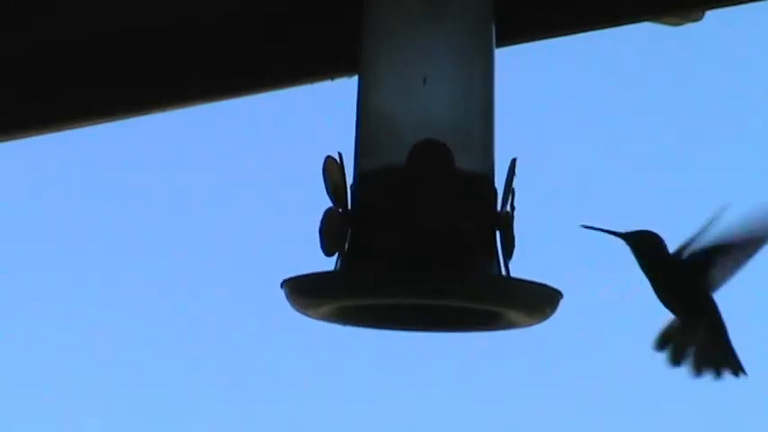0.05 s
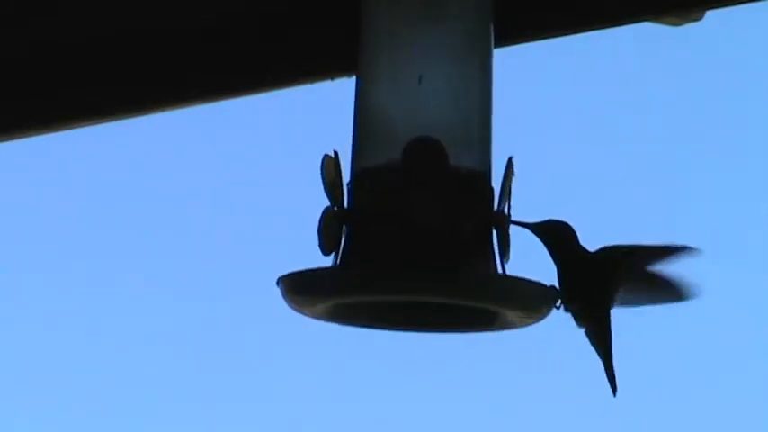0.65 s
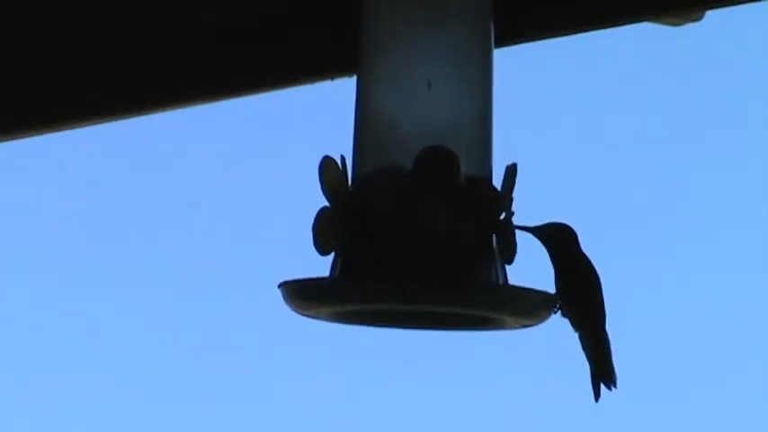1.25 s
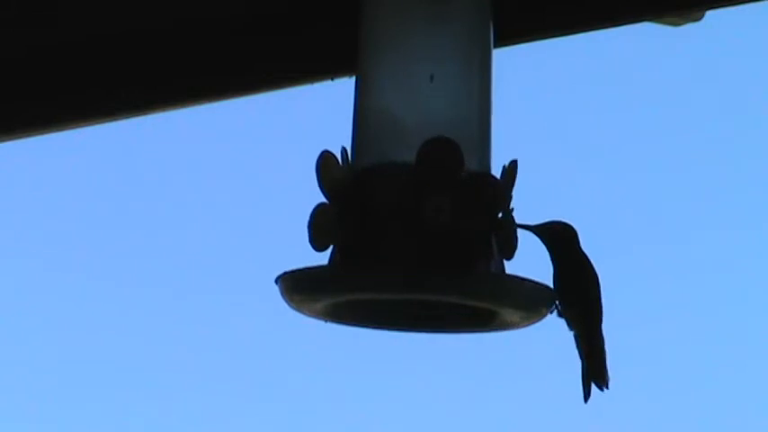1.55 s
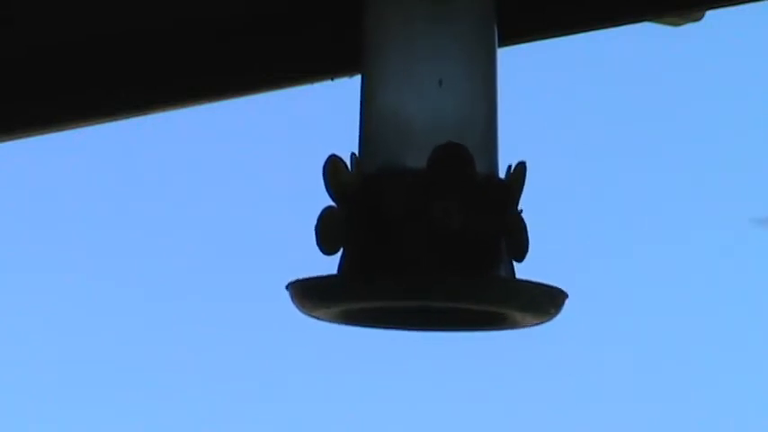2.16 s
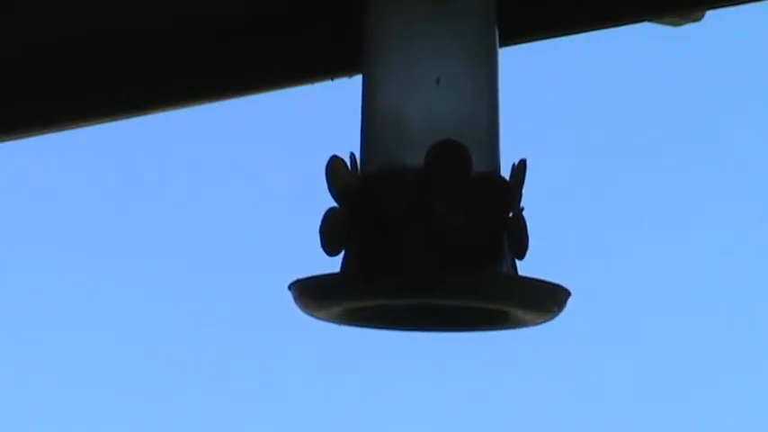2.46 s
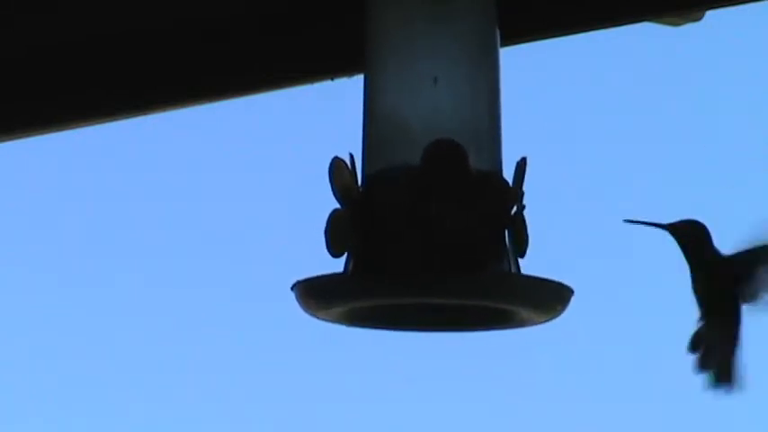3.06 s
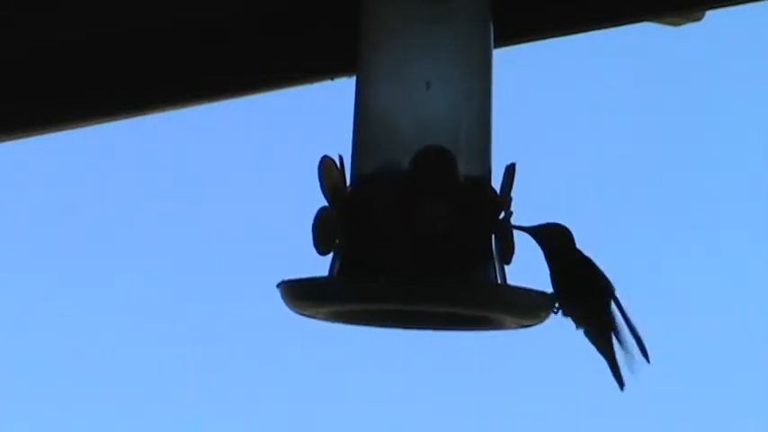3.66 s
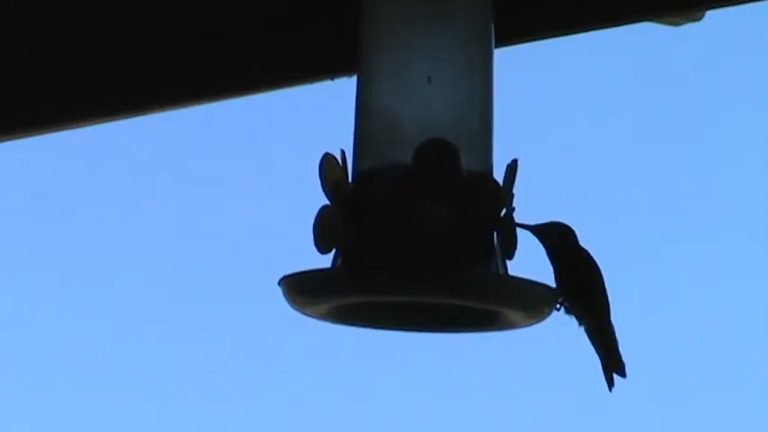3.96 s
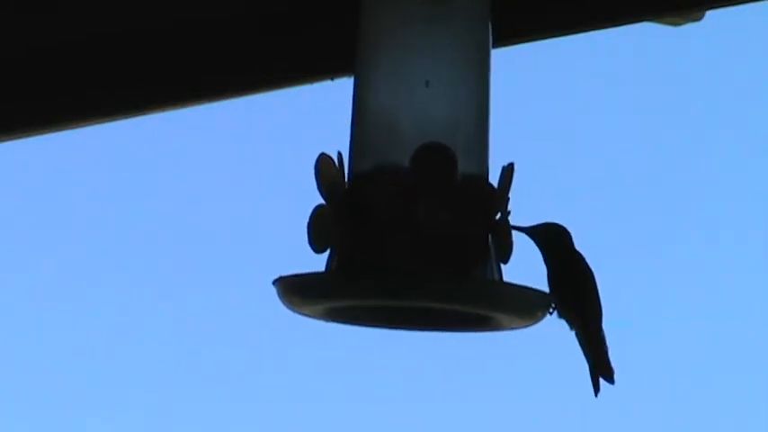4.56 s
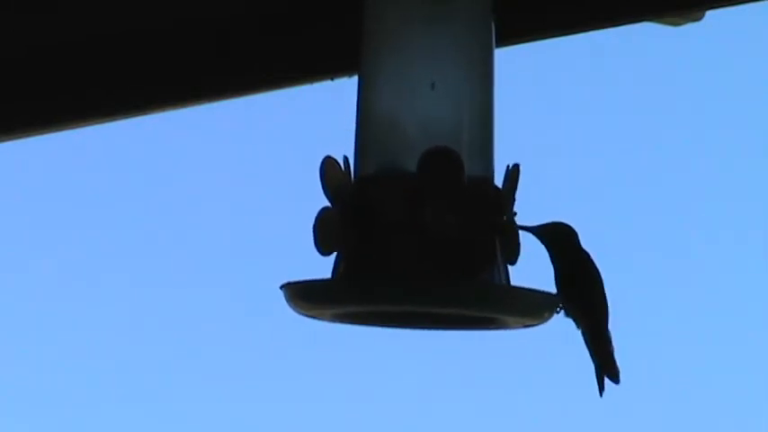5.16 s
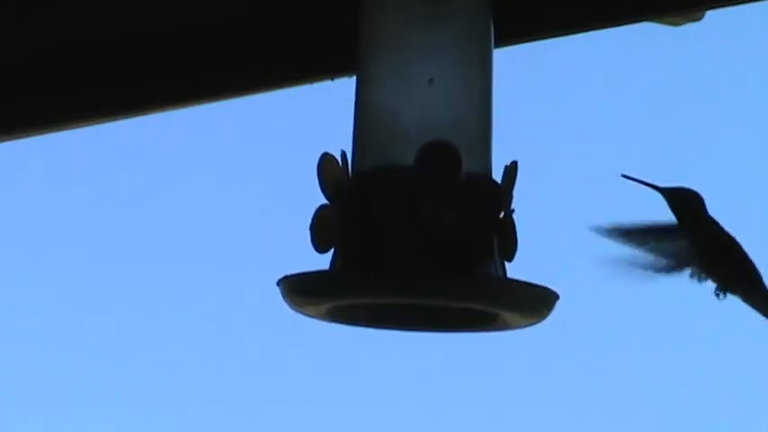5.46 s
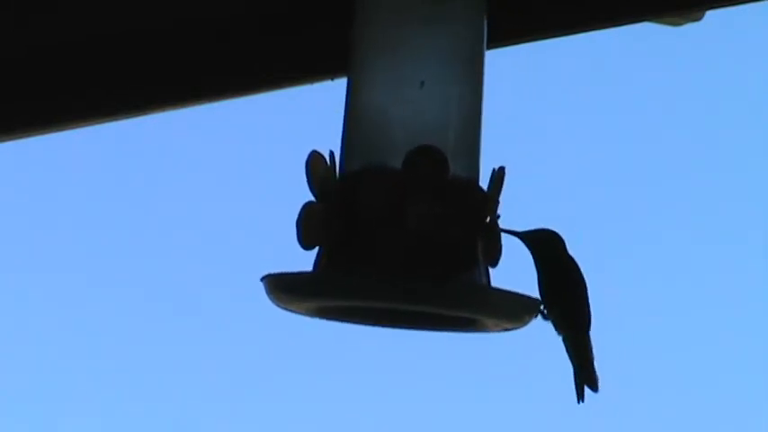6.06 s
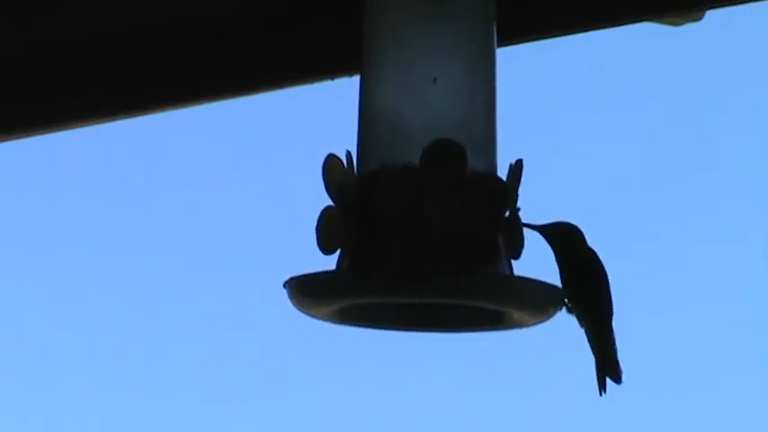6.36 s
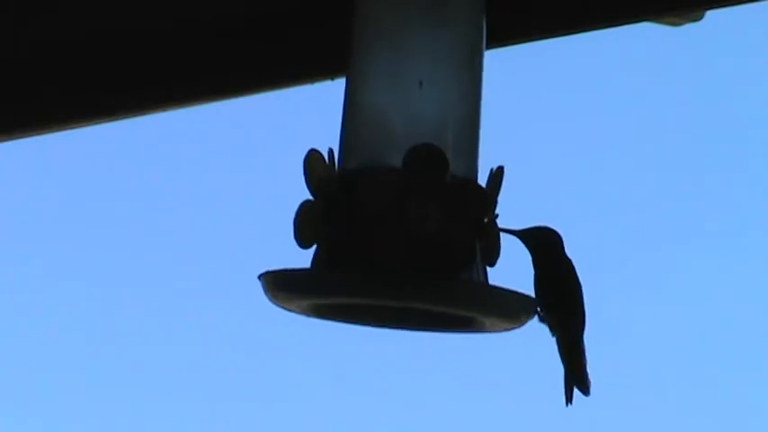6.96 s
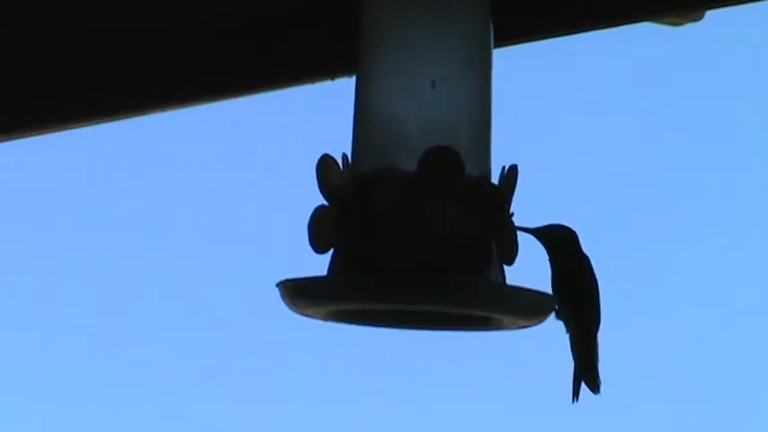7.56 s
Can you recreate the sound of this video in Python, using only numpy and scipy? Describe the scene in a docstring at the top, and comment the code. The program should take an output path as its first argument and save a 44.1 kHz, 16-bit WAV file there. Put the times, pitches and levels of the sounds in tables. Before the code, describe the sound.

Finches whistle and twitter outdoors while hummingbirds chip and scold at a feeder, with thin distant bird calls and soft background air.

```python
"""Finches whistle and twitter in a garden, each note a nearly pure, gliding tone of the syrinx.
Hummingbirds chip (two voices in a rasp) and scold (rough harmonics in a throat resonance).
Thin high slurs and low hoots come from farther off; eaves, walls and trees echo every call.
Beneath lie outdoor air, two soft puffs, a distant motor spinning up, hums, and camera hiss and whine."""
import sys
import numpy as np
from scipy import signal
from scipy.fft import rfft, irfft, next_fast_len
from scipy.io import wavfile
from scipy.ndimage import map_coordinates

SR = 44100
rng = np.random.default_rng(int(sys.argv[2]) if len(sys.argv) > 2 else 0)


def persist_wave(psi):
    """Save psi, clipped to +-1, as 16-bit WAV."""
    counts = np.round(np.clip(psi, -1, 1) * 32767).astype(np.int16)
    wavfile.write(sys.argv[1], SR, np.atleast_2d(counts).T)


N = 344862
PREROLL = SR // 4  # samples before time zero, whose echoes still ring
SOFT_EDGES = dict(attack_s=.011, release_s=.013)


def amp(db):
    """Decibels to gain."""
    return 10 ** (np.asarray(db) / 20)


def unit(x):
    """Scale to rms 1."""
    return x / np.sqrt(np.mean(x ** 2) + 1e-20)


def along(points, hz):
    """Read (frequency [Hz], value) points on a log axis."""
    knots_hz, values = np.transpose(points)
    return np.interp(np.log(hz + 1), np.log(knots_hz + 1), values)


def wobble(knots_per_s, size):
    """Smooth random curve, rms about 1."""
    knots = rng.standard_normal(int(size * knots_per_s / SR) + 4)
    return map_coordinates(knots, [np.arange(size) * knots_per_s / SR])


def filtered(x, response):
    """Apply a gain given as a function of frequency."""
    size = x.shape[-1]
    padded = next_fast_len(size + 8192)
    return irfft(rfft(x, padded) * response(np.fft.rfftfreq(padded, 1 / SR)), padded)[..., :size]


def bell(x, centre, width):
    """Gaussian, peak 1; width is two sigma."""
    return np.exp(-.5 * ((x - centre) / (width / 2)) ** 2)


def phase_of(hz):
    """Phase [rad] of a moving frequency."""
    return 2 * np.pi * np.cumsum(hz) / SR


def clock(length_s):
    """Sample times [s]."""
    return np.arange(int(length_s * SR)) / SR


def silence():
    """Empty track with preroll."""
    return np.zeros(PREROLL + N)


def add(track, at_s, sound):
    """Mix a sound into a track."""
    start = PREROLL + round(at_s * SR)
    part = sound[:len(track) - start]
    track[start:][:len(part)] += part


def stereo_noise(coherence, size):
    """White noise at two close microphones."""
    def mid_side_gains(hz):
        angle = np.arccos(np.clip(along(coherence, hz), -1, 1)) / 2
        return np.array([np.cos(angle), np.sin(angle)])
    mid, side = filtered(rng.standard_normal((2, size)), mid_side_gains)
    return np.array([mid + side, mid - side])


def air():
    """Outdoor air and microphone hiss."""
    # noise spectrum: (frequency [Hz], relative level [dB])
    spectrum = [(20, -15), (45, -6), (120, 0.5), (165, -3.5), (210, 3.5), (260, -2), (800, -4.5),
                (1200, -7), (3000, -9), (6000, -16), (9000, -19)]
    # left-right likeness: (frequency [Hz], coherence [0-1])
    coherence = [(60, 0.85), (130, 1), (300, 0.021), (1500, 0.046), (8000, 0.48), (13000, 0.98)]
    level_db = -51.5 + .3 * wobble(3.1, N)
    noise = filtered(stereo_noise(coherence, N), lambda hz: amp(along(spectrum, hz)))
    return amp(level_db) * unit(noise)


def hums():
    """Steady hums and the camera's whine, wavering slightly."""
    # tones: (frequency [Hz], level [dB])
    tones = [(37, -75), (72, -65), (543.5, -63.5), (15736, -67)]
    out = np.zeros(N)
    for hz, db in tones:
        gain = np.sqrt(2) * amp(db + 1.76 * wobble(3.97, N))
        out += gain * np.sin(phase_of(hz + 1.296 * wobble(9, N)))
    return out


def motor():
    """Distant throbbing motor: the shaft gathers speed, then holds it."""
    # loudness: (time [s], level [dB])
    loudness = [(2.2, -79), (2.26, -68), (3.23, -61), (3.47, -66.5), (4.78, -59), (4.96, -53.5),
                (5.57, -55.5), (5.63, -61.5), (6.09, -55), (6.33, -66), (6.62, -55.5), (7.8, -72)]
    start_s, start_hz, spin_up_hz_per_s, full_hz = 2.2, 29, 72.3, 58.5
    t = np.arange(N) / SR
    shaft_hz = np.minimum(start_hz + spin_up_hz_per_s * np.maximum(t - start_s, 0), full_hz)
    return np.sqrt(2) * amp(np.interp(t, *np.transpose(loudness))) * np.sin(phase_of(shaft_hz))


def puffs():
    """A soft rustle and a low puff: swells of band noise."""
    # swells: (time [s], length [s], centre [Hz], width [Hz], level [dB])
    swells = [(1.695, 0.046, 1500, 4500, -50), (3.04, 0.11, 257, 220, -55.5)]
    out = silence()
    for at_s, length_s, centre_hz, width_hz, db in swells:
        size = int(length_s * SR)
        noise = unit(filtered(rng.standard_normal(size), lambda hz: bell(hz, centre_hz, width_hz)))
        add(out, at_s, amp(db) * np.hanning(size) * noise)
    return out


def echoes(early_db, late_db):
    """Impulse response: quick echoes off eaves and walls, a longer wash from the trees."""
    # decay of the wash: (frequency [Hz], T60 [s])
    wash_t60 = [(2500, 0.61), (7000, 0.43), (14000, 0.18)]
    wash_rise_s, wall_t60_s, wall_delay_s = .01, .16, .002
    hz, t, spectra = signal.stft(stereo_noise([(2000, .55)], SR * 3 // 4), SR, nperseg=256)
    wash = signal.istft(spectra * amp(-60 * t / along(wash_t60, hz)[:, None]), SR, nperseg=256)[1]
    t = np.arange(wash.shape[1]) / SR
    wash *= 1 - np.exp(-t / wash_rise_s)
    walls = stereo_noise([(2000, .52)], len(t)) * amp(-60 * t / wall_t60_s) * (t > wall_delay_s)
    early = amp(early_db) * walls / np.linalg.norm(walls)
    late = amp(late_db) * wash / np.linalg.norm(wash)
    return np.sqrt(2) * (early + late)


def garden(call, early_db, late_db, pan_db):
    """Direct call plus echoes that shift as the bird turns, so held notes swell and waver."""
    facing_rad = 1.1 * wobble(10, len(call))
    wet = sum(signal.fftconvolve((call * share)[None], echoes(early_db, late_db), axes=1)[:, :len(call)]
              for share in (np.cos(facing_rad), np.sin(facing_rad)))
    direct = np.array([call * amp(pan_db / 2), np.roll(call, 1) * amp(-pan_db / 2)])  # left leads
    return (direct + wet)[:, PREROLL:]


def note(pitch_hz, db, waver, waver_per_s, overtones_db=(), attack_s=.0028, release_s=.0026):
    """Nearly pure syrinx tone; waver is a share of the pitch."""
    t = np.arange(len(pitch_hz)) / SR
    phase = phase_of(pitch_hz * (1 + waver * wobble(waver_per_s, len(t))))
    air_valve = np.clip(np.minimum(t / attack_s, (t[-1] - t) / release_s), 0, 1)
    beak_hz, beak_width_hz = 11700, 6900  # overtones escape only through this resonance
    overtones = sum(amp(level_db) * bell(k * pitch_hz, beak_hz, beak_width_hz) * np.sin(k * phase)
                    for k, level_db in enumerate(overtones_db, 2))
    return np.sqrt(2) * amp(db) * air_valve * (np.sin(phase) + overtones)


def slurs(singer):
    """Yield time, pitch and level of one voice's plain glides."""
    # glides: (voice, time [s], length [s], from [Hz], to [Hz], mid level [dB], swell [dB])
    glides = [("whistler", 1.83, .25, 2280, 1480, -39, -4), ("whistler", 2.275, .036, 2200, 2580, -39, 4),
              ("whistler", 2.305, .05, 3350, 2430, -43.5, 14),
              ("whistler", 2.572, .036, 2200, 2540, -36.5, 4),
              ("whistler", 2.6, .054, 3350, 2430, -42.5, 15), ("whistler", 2.265, .025, 2850, 3350, -56, 0),
              ("whistler", 2.56, .025, 2850, 3350, -50, 0), ("whistler", 3.18, .1, 1830, 1570, -44, -6),
              ("far", 2.0, .17, 5900, 4300, -65, 0), ("far", 2.31, .07, 4900, 6550, -56, 6.8),
              ("far", 2.38, .085, 6450, 5500, -57, -2), ("far", 2.51, .14, 4850, 3550, -62.5, -3),
              ("far", 3.445, .04, 7200, 5100, -62, 0), ("far", 2.9, .1, 5750, 5480, -62.5, 2),
              ("far", 2.98, .05, 5100, 4200, -63, 0), ("far", 4.98, .08, 7200, 8030, -63, 8),
              ("far", 5.06, .155, 8030, 5850, -54, 2), ("far", 5.38, 0.087, 6700, 7200, -60, -8),
              ("far", 5.53, .15, 7870, 5830, -56.5, 1), ("far", 5.76, 0.074, 6900, 3900, -56, 4.6),
              ("far", 5.85, .14, 3550, 3070, -61, -3), ("far", 6.39, .15, 7350, 5500, -62, 8),
              ("far", 6.82, .14, 8640, 6940, -58, 3), ("far", 7.215, .255, 8550, 4950, -54, 7.3),
              ("far", 7.65, .16, 3450, 3720, -56.5, 0), ("hoarse", 1.812, 0.0496, 2490, 2350, -46.5, -6),
              ("hoarse", 4.115, 0.0395, 2800, 3400, -53, 0), ("hoarse", 4.32, 0.0596, 3560, 3880, -45.5, 0),
              ("hoarse", 6.578, .025, 5600, 4200, -53, 0), ("hoarse", 6.655, .09, 3200, 4900, -45, -3),
              ("peep", 4.255, 0.0296, 3400, 2850, -36, 0), ("peep", 6.594, .03, 3350, 2800, -35, 0)]
    easing = .5  # 0 straight, 1 eased in and out
    for voice, at_s, length_s, from_hz, to_hz, db, swell_db in glides:
        if voice == singer:
            u = clock(length_s) / length_s
            eased = u + easing * (np.sin(np.pi * u / 2) ** 2 - u)
            yield at_s, from_hz * (to_hz / from_hz) ** eased, db + swell_db * (u - .5)


def hoots():
    """Low distant calls, some clear, some gruff."""
    # hoots: (time [s], length [s], pitch [Hz], level [dB], roughness [share of pitch])
    calls = [(.44, 0.066, 854, -66, .025), (.78, .08, 865, -67, .025), (1.03, 0.086, 862, -65, .04),
             (3.49, 0.088, 779, -57, .12), (3.814, 0.081, 805, -55.5, .09)]
    out = silence()
    for at_s, length_s, hz, db, roughness in calls:
        pitch_hz = np.full(int(length_s * SR), hz)
        add(out, at_s, note(pitch_hz, db, waver=roughness, waver_per_s=200, **SOFT_EDGES))
    return out


def far_birds():
    """Thin high slurs, and short pips that sag and fade."""
    # pips: (time [s], start level [dB], start pitch [Hz])
    pips = [(4.243, -44, 4450), (4.54, -47.5, 6180), (4.676, -43.5, 6430), (4.815, -46, 6480),
            (4.96, -46, 6430)]
    pip_s, sag_hz_per_s, fade_db_per_s = .035, 17300, 450
    out, t = silence(), clock(pip_s)
    for at_s, pitch_hz, db in slurs("far"):
        add(out, at_s, note(pitch_hz, db, waver=.014, waver_per_s=970, **SOFT_EDGES))
    for at_s, db, hz in pips:
        add(out, at_s, note(hz - sag_hz_per_s * t, db - fade_db_per_s * t,
                            waver=.03, waver_per_s=743, attack_s=.0069))
    return out


def rasp(length_s):
    """Short swell of gritty hiss from a small throat."""
    # hiss spectrum: (frequency [Hz], relative level [dB])
    spectrum = [(1500, -21), (2800, 2), (4500, -1.5), (7000, -4.5), (9000, -13), (14000, -29)]
    size = int(length_s * SR)
    hiss = filtered(rng.standard_normal(size), lambda hz: amp(along(spectrum, hz)))
    return unit(hiss * np.hanning(size) * amp(3 * wobble(602, size)))


def hummingbird_chips():
    """Both sides of the syrinx sing a small arch of pitch; a rasp marks the onset."""
    # chips: (time [s], crest [Hz], tone level [dB], rasp level [dB])
    chips = [(3.153, 3500, -56, -54.5), (3.18, 3240, -49.5, -56.5), (3.241, 4180, -54.5, -58),
             (3.318, 4180, -54, -57), (3.392, 4100, -55, -59), (3.605, 4400, -53, -60),
             (3.635, 4080, -49.5, -64), (3.695, 4200, -55, -60), (3.783, 4930, -50, -57),
             (3.958, 4890, -46, -54), (4.04, 4400, -55, -59), (5.058, 3000, -54, -53),
             (5.092, 3500, -51, -51), (5.174, 3050, -49.5, -60), (5.25, 3090, -53.5, -55),
             (5.32, 2990, -54, -55), (5.436, 3100, -52, -58), (5.5, 3140, -48, -61),
             (6.278, 2900, -44, -58), (6.411, 2850, -45, -60), (6.495, 2900, -51, -62)]
    length_s, crest_place, bend = .0301, .3, .55
    upper_ratio, upper_db = 1.64, -9
    out, u = silence(), clock(length_s) / length_s
    for at_s, crest_hz, tone_db, rasp_db in chips:
        pitch_hz = crest_hz * (1 - bend * (u - crest_place) ** 2)
        for hz, db in [(pitch_hz, tone_db), (upper_ratio * pitch_hz, tone_db + upper_db)]:
            add(out, at_s, note(hz, db, waver=.02, waver_per_s=900, attack_s=.006, release_s=.008))
        add(out, at_s, amp(rasp_db) * rasp(length_s=.018))
    return out


def hummingbird_scolds():
    """Harmonics sag and break up in a sinking throat resonance; hiss leads the voice."""
    # scolds: (time [s], level [dB], start pitch [Hz], start resonance [Hz])
    scolds = [(3.728, -52, 766, 6540), (3.908, -50, 730, 6100), (5.815, -46.5, 741, 6600),
              (5.998, -44, 747, 6350), (6.174, -45, 741, 6400)]
    length_s, rasp_lead_s, rasp_db = .08, .022, -7.5
    pitch_sag, throat_sag, roughness = .45, .27, .03  # shares reached by the end
    out, u = silence(), clock(length_s) / length_s
    harmonics = np.arange(2, 14)[:, None]
    for at_s, db, start_hz, throat_hz in scolds:
        jitter = roughness * np.sqrt(u) * wobble(1200, len(u))
        pitch_hz = start_hz * (1 - pitch_sag * u ** 2) * (1 + jitter)
        throat = bell(harmonics * pitch_hz, throat_hz * (1 - throat_sag * u), throat_hz / 4.2)
        phases = harmonics * phase_of(pitch_hz) + rng.uniform(0, 2 * np.pi, harmonics.shape)
        voice = (throat * np.sin(phases)).sum(0)
        add(out, at_s, amp(db) * unit(voice * u * (1 - u) ** 2))
        add(out, at_s - rasp_lead_s, amp(db + rasp_db) * rasp(length_s + rasp_lead_s))
    return out


def hoarse_calls_and_peeps():
    """Slurs turned hoarse by fast pitch shake, and clearer falling peeps."""
    out = silence()
    for at_s, pitch_hz, db in slurs("hoarse"):
        add(out, at_s, note(pitch_hz, db, waver=.121, waver_per_s=1100, attack_s=.0095))
    for at_s, pitch_hz, db in slurs("peep"):
        add(out, at_s, note(pitch_hz, db, waver=.025, waver_per_s=900, **SOFT_EDGES))
    return out


def finch_twitter():
    """One learnt "tsee-oo", a chain of pitch arches, repeated and closed by a flourish."""
    # one syllable: (delay [s], length [s], crest place [0-1], crest [Hz], drop [Hz], level [dB])
    arches = [(.002, 0.015, 0.53, 5100, 1100, -36.5), (.016, 0.019, .55, 6610, 1900, -27.5),
              (0.042, 0.013, .6, 4154, 200, -29.5), (.057, .034, 0.06, 4000, 830, -31)]
    # syllables sung: (time [s], gain [dB], pitch [ratio])
    syllables = [(-.079, 0.5, .97), (.037, -1.5, .96), (.153, -1.5, .97), (.268, -1.5, .97),
                 (6.77, 0, 0.98), (6.886, .5, 0.97), (7, 0, 0.96)]
    # one flourish: (delay [s], pitch [Hz], level [dB])
    contour = [(.002, 2628, -31), (.02, 2320, -43), (.046, 2094, -52), (.062, 2427, -35),
               (.075, 3072, -24.5), (.088, 2350, -34), (.105, 1956, -40), (.148, 1610, -58)]
    # flourishes sung: (time [s], gain [dB], pitch [ratio])
    flourishes = [(.388, -4.5, 1), (7.12, -3.5, 1)]
    out = silence()
    for at_s, gain_db, ratio in syllables:
        for delay_s, length_s, crest, crest_hz, drop_hz, db in arches:
            from_crest = np.abs(clock(length_s) / length_s - crest) / max(crest, 1 - crest)
            pitch_hz = ratio * (crest_hz - drop_hz * from_crest ** 1.69)  # more pointed than a parabola
            add(out, at_s + delay_s, note(pitch_hz, db + gain_db, waver=.0098, waver_per_s=734,
                                          overtones_db=[-22, -30], attack_s=.0056, release_s=.0033))
    knots_s, knots_hz, knots_db = np.transpose(contour)
    t = np.arange(knots_s[0], knots_s[-1], 1 / SR)
    pitch_hz, db = np.interp(t, knots_s, knots_hz), np.interp(t, knots_s, knots_db)
    for at_s, gain_db, ratio in flourishes:
        add(out, at_s + knots_s[0], note(ratio * pitch_hz, db + gain_db, waver=.015, waver_per_s=726))
    return out


def dives():
    """Yield time, pitch and level of whistles that drop fast, then slide on as they swell."""
    # whistles: (time [s], length [s], start [Hz], trough [Hz], end [Hz], dive time constant [s],
    # final level [dB], swell [dB])
    whistles = [(.935, 0.3, 2950, 1975, 1880, .018, -40, 6),
                (1.365, 0.265, 3250, 2400, 2435, .012, -33, 6.5),
                (3.75, .238, 3080, 1890, 2730, .023, -27, 15),
                (4.508, .22, 3200, 1926, 2698, 0.024, -27.5, 13.5),
                (5.041, .2, 2074, 1827, 1875, 0.0076, -35.5, 0),
                (5.993, 0.34, 2840, 1947, 1828, .018, -37.5, 1)]
    for at_s, length_s, start_hz, trough_hz, end_hz, dive_s, db, swell_db in whistles:
        t = clock(length_s)
        slide_hz = trough_hz + (end_hz - trough_hz) * t / length_s
        dive_hz = (start_hz - trough_hz) * np.exp(-t / dive_s)
        yield at_s, slide_hz + dive_hz, db - swell_db * (1 - t / length_s) ** 2


def yodels():
    """Yield time, pitch and level of whistles that fall, then flip up to a held note."""
    # yodels: (time [s], fall [s], hold [s], start [Hz], low [Hz], held [Hz], end [Hz],
    # fall level [dB], held level [dB], hold swell [dB])
    calls = [(0, 0.055, 0.22, 2200, 1833, 1866, 1926, -50, -43, 10),
             (0.549, 0.135, 0.13, 2498, 2170, 2516, 2590, -45, -42.5, -9),
             (2.296, 0.05, 0.11, 2655, 1784, 1934, 1885, -50, -43.5, 12),
             (2.595, 0.051, 0.11, 2647, 1780, 1938, 1887, -48.5, -43, 11),
             (2.95, 0.094, 0.14, 1800, 1550, 2020, 2120, -45, -39.5, 6),
             (3.435, .06, 0.15, 2950, 1753, 1952, 1897, -44, -38.5, 9),
             (4.15, .066, 0.146, 2950, 1792, 2100, 2020, -40.5, -30, -2),
             (4.93, 0.033, 0.085, 1950, 1802, 2097, 2072, -44.5, -39, 2),
             (5.549, 0.16, 0.14, 2600, 2174, 2520, 2580, -42, -41.5, -9)]
    fall_easing, fall_swell_db, flip_s = 1.9, 6.5, .017
    for at_s, fall_s, hold_s, start_hz, low_hz, held_hz, end_hz, fall_db, held_db, swell_db in calls:
        t = clock(fall_s + hold_s)
        fallen, held = np.minimum(t / fall_s, 1), (t - fall_s) / hold_s
        flip = 1 - np.exp(-(np.maximum(t - fall_s, 0) / flip_s) ** 2)
        falling_hz = low_hz + (start_hz - low_hz) * (1 - fallen) ** fall_easing
        holding_hz = held_hz + (end_hz - held_hz) * held
        falling_db = fall_db + fall_swell_db * (fallen - .5)
        holding_db = held_db + swell_db * (held - .5)
        pitch_hz = falling_hz + (holding_hz - low_hz) * flip
        yield at_s, pitch_hz, falling_db + (holding_db - falling_db) * flip


def finch_whistles():
    """Plaintive dives, yodels and slurs, slightly unsteady, at times quavering."""
    # stretches of fast vibrato: (start [s], end [s])
    quavers = [(.56, 0.65), (1.83, 1.84), (2.275, 2.4), (2.572, 2.61), (3.06, 3.18), (5.57, 5.7)]
    # brief level dips: (time [s], depth [dB])
    dips = [(1.55, 6.5), (3.57, 8), (3.905, 7), (4.625, 7), (5.175, 6), (6.087, 8), (6.158, 8), (6.268, 14)]
    vibrato_hz, wander_per_s, dip_width_s = 135, 40.03, .021
    out = silence()
    for at_s, pitch_hz, db in [*dives(), *yodels(), *slurs("whistler")]:
        t = at_s + np.arange(len(pitch_hz)) / SR
        quavering = sum((t > start_s) & (t < end_s) for start_s, end_s in quavers)
        vibrato = .045 * quavering * np.sin(phase_of(vibrato_hz + 20 * wobble(60, len(t))))
        drift = .0049 * wobble(wander_per_s, len(t))
        flutter_db = 1.7 * wobble(wander_per_s, len(t))
        dip_db = sum(depth_db * bell(t, dip_s, dip_width_s) for dip_s, depth_db in dips)
        add(out, at_s, note(pitch_hz * (1 + vibrato + drift), db + flutter_db - dip_db, waver=.0047,
                            waver_per_s=200, overtones_db=[-40, -37, -33.5, -41], **SOFT_EDGES))
    return out


def scene():
    """The farther the bird, the more of its call arrives as echo."""
    # whistler's stereo balance: (frequency [Hz], left minus right [dB])
    lean = [(1900, 2), (2400, -1)]
    whistles = garden(finch_whistles(), early_db=-2, late_db=-8.5, pan_db=-1.5)
    whistles = filtered(whistles, lambda hz: amp(np.outer([.5, -.5], along(lean, hz))))
    twitter = garden(finch_twitter() + hoarse_calls_and_peeps(), early_db=-3, late_db=-7.5, pan_db=-3.5)
    feeder = garden(hummingbird_chips() + hummingbird_scolds() + puffs(),
                    early_db=-3, late_db=-5, pan_db=-3.5)
    distant = garden(far_birds() + hoots(), early_db=3.5, late_db=.5, pan_db=1)
    return whistles + twitter + feeder + distant + air() + hums() + motor()


def record(dry):
    """Brick-wall low-pass."""
    return filtered(dry, lambda hz: hz < 15900)


dry = scene()
out = record(dry)
persist_wave(out)
```